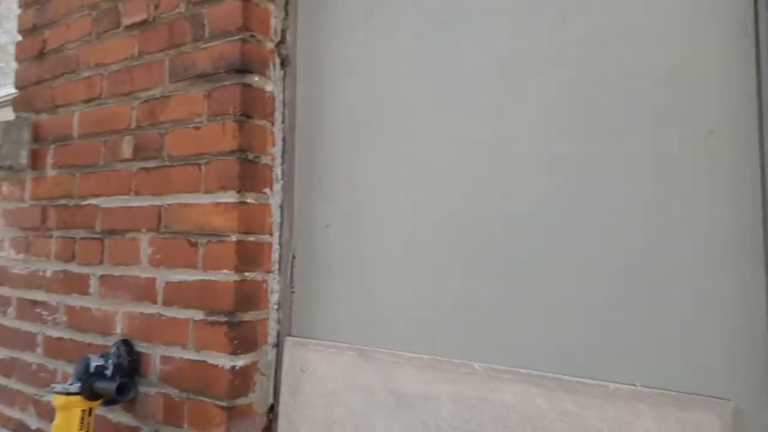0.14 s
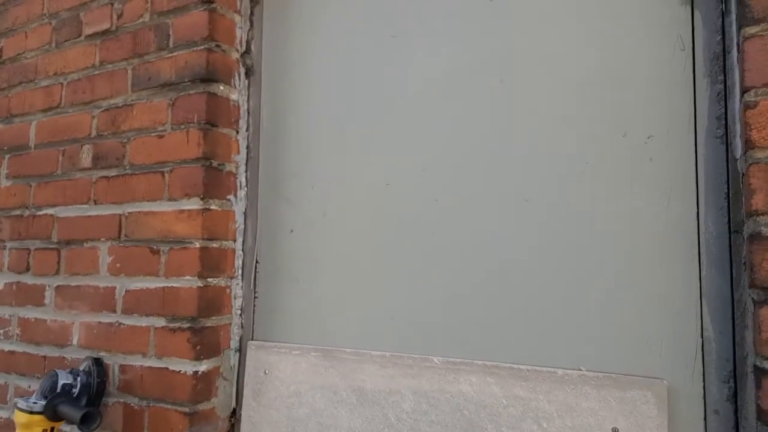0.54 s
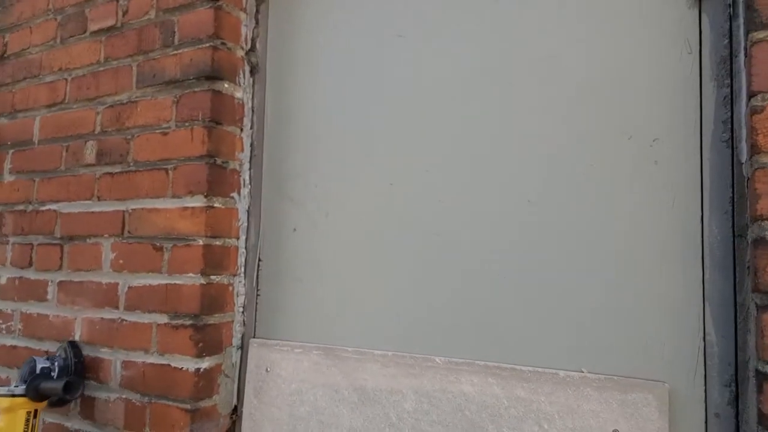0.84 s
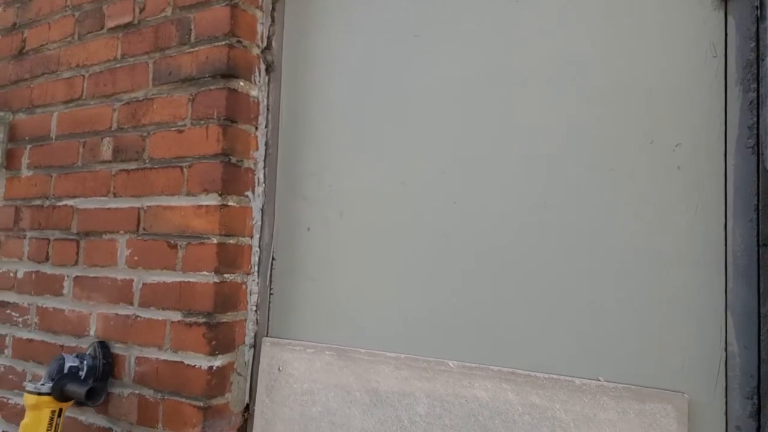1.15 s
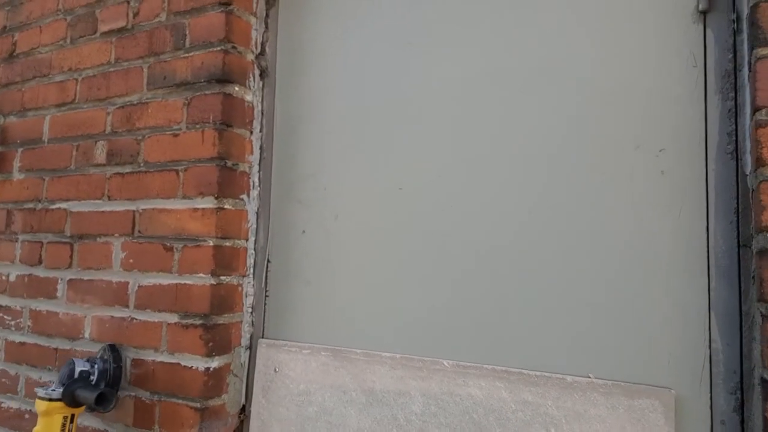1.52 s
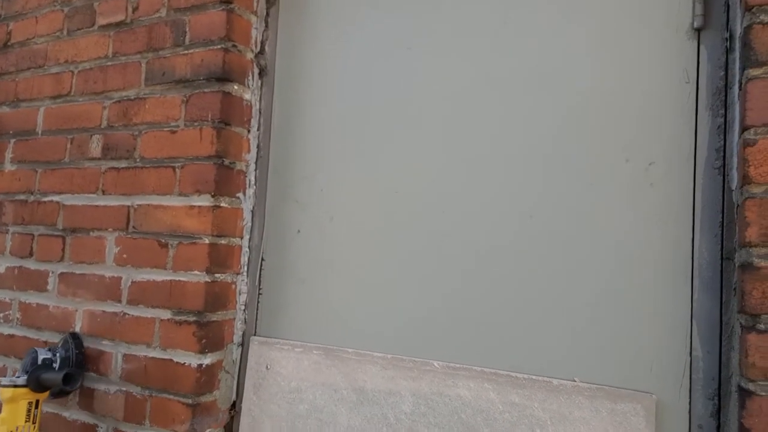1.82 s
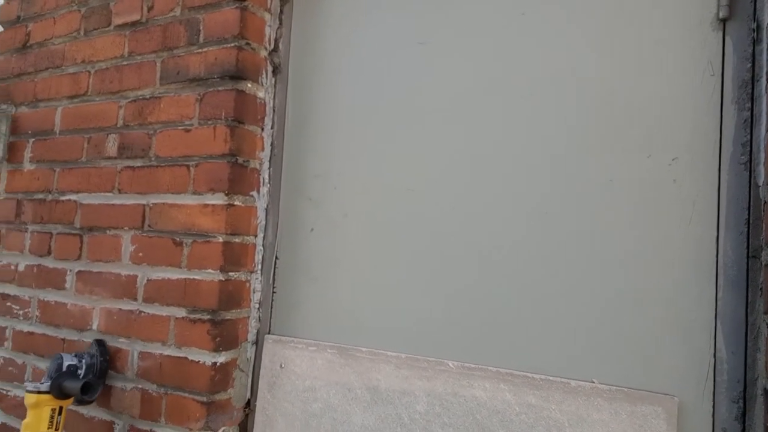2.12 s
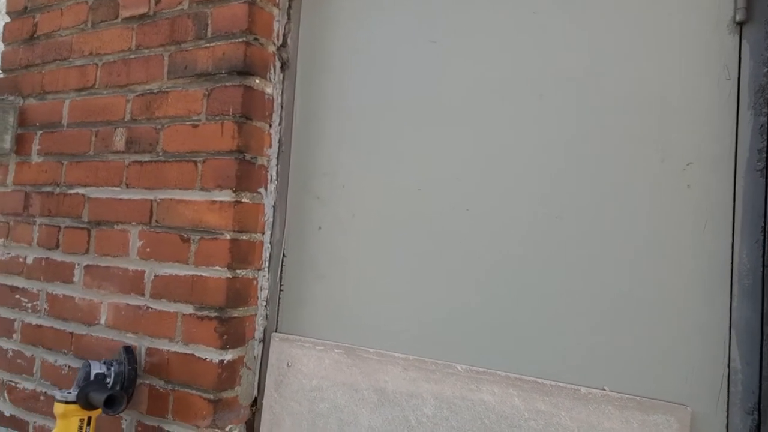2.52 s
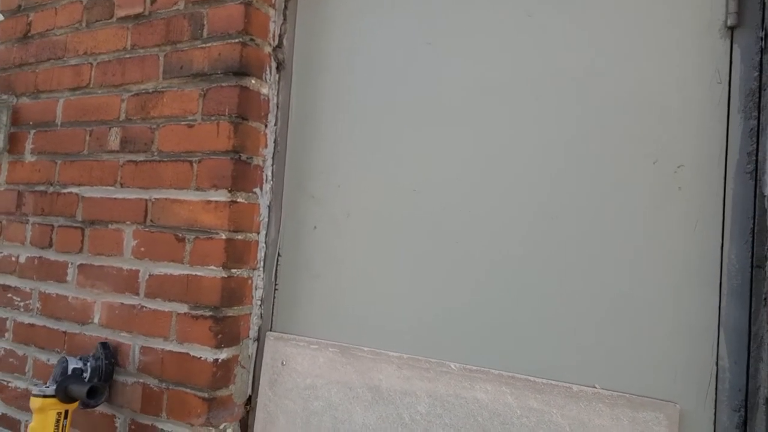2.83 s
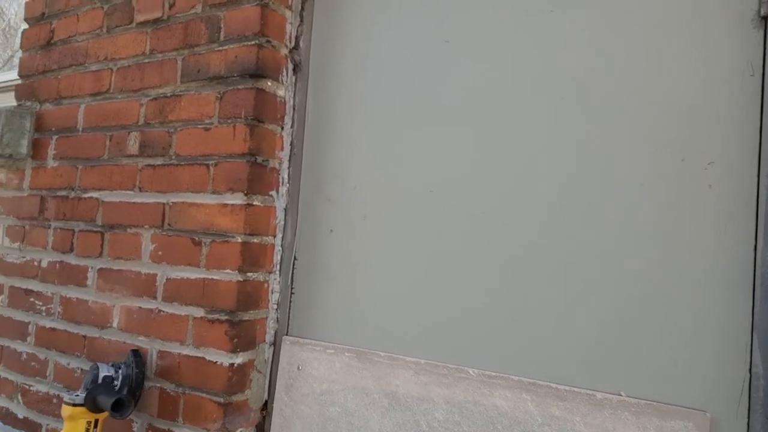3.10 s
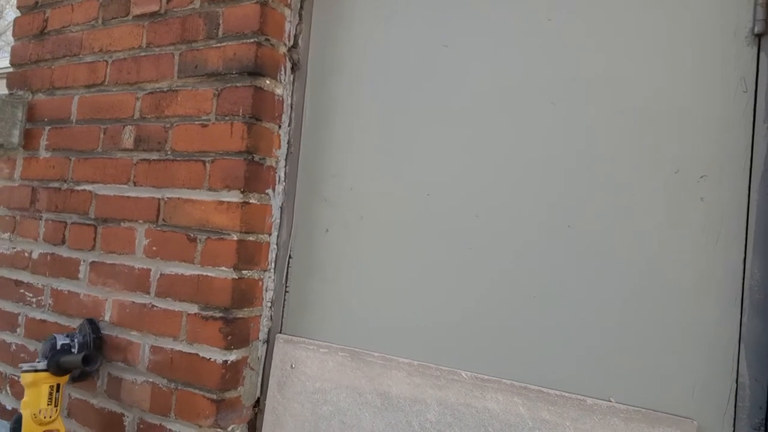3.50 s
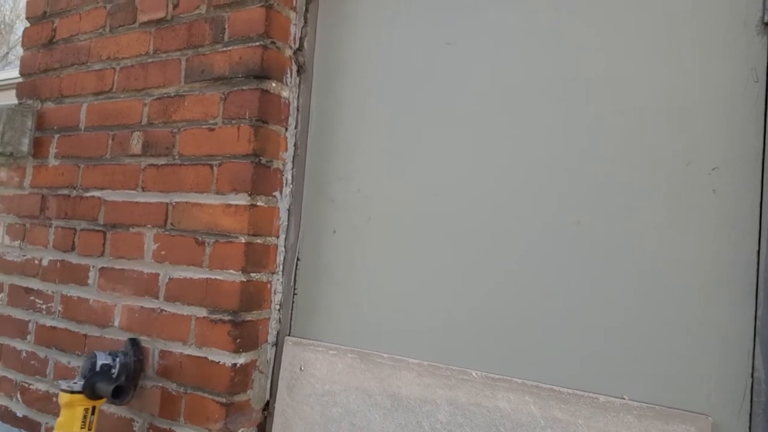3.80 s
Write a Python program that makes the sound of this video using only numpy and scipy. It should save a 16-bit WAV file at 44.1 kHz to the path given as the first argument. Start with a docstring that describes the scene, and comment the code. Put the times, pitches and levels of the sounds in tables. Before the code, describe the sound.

A handheld angle grinder grinds mortar from brick throughout, its bright hiss fluttering rapidly over a whine that sags slightly; outdoors, close to a stereo camera microphone, slightly left, with low wind thumps.

```python
"""A handheld grinder scrapes mortar off a brick wall outdoors, a little left of a two-port camera microphone.
The grit is already running at the start: its hiss throbs as the disc's high spot bites once a turn; motor
and gears whine under it while multiples of the turn ring in and out. The strongest wind buffet comes near
0.7 s, the wind rumble lulls near 1.9 s, and the disc sags under load from 108.5 to about 105 turns per second.
Buffets crowd together after 3.1 s. Filtered noise makes grit, body and wind; sines make the tones."""
import sys
import numpy as np
from scipy import signal
from scipy.fft import rfft, irfft
from scipy.io import wavfile
from scipy.ndimage import uniform_filter1d, map_coordinates

SR = 44100
rng = np.random.default_rng(int(sys.argv[2]) if len(sys.argv) > 2 else 0)


def to_wav(s):
    """Save 16-bit WAV."""
    ch = np.atleast_2d(s).T  # columns
    pcm = np.round(np.clip(ch, -1, 1) * 32767)  # PCM
    wavfile.write(sys.argv[1], SR, pcm.astype(np.int16))


N = 174195

# Hearing of the two ports: (frequency [Hz], likeness [0-1], left minus right [dB])
PORT_HEARING = [(200, .5, 1), (700, .78, 1.5), (1200, .8, 1.4), (2500, .55, .8), (3300, .62, .8),
                (4200, .5, 1.5), (5500, .76, 3), (7500, .5, 3), (9000, .42, 1.5), (11000, .52, 3),
                (14000, .3, 2)]
PORT_LAG_S = 8.5 / 44100  # the right port hears the tool this much later


def undb(db):
    """Logarithmic level: amplitude gain of a dB value."""
    return 10 ** (np.asarray(db) / 20)


def curve(table, col):
    """Linear interpolation of a table column over time."""
    rows = np.array(table, float)
    return np.interp(np.arange(N) / SR, rows[:, 0], rows[:, col])


def bin_hz():
    """Discrete spectrum: frequency of each bin."""
    return np.fft.rfftfreq(N, 1 / SR)


def over_hz(table, col=1):
    """Interpolation of a table column over log frequency."""
    rows = np.array(table, float)
    return np.interp(np.log(bin_hz() + 1), np.log(rows[:, 0]), rows[:, col])


def unit(x):
    """Power normalisation: scale to rms 1."""
    return x / np.sqrt(np.mean(x ** 2))


def walk(rate):
    """Band-limited random modulation: levels held 1 / rate s and slewed twice; spread near 1."""
    hold = int(SR / rate)
    steps = np.repeat(rng.standard_normal(N // hold + 1), hold)
    slewed = uniform_filter1d(uniform_filter1d(steps, hold), hold)
    return 1.3 * slewed[:N]


def port_path():
    """Time and level differences: phase of the right port's delay, and half the level difference as a gain."""
    late = np.exp(-2j * np.pi * bin_hz() * PORT_LAG_S)
    lean = undb(over_hz(PORT_HEARING, col=2) / 2)
    return late, lean


def ports(direct, scattered):
    """Partial coherence: both ports share the direct spectrum, while the scattered ones differ."""
    like = np.clip(over_hz(PORT_HEARING), 0, 1)
    late, lean = port_path()
    direct_pair = direct * np.array([np.ones_like(late), late])
    both = np.sqrt(like) * direct_pair + np.sqrt(1 - like) * scattered
    return both * np.array([lean, 1 / lean])


def noise():
    """Partly coherent white noise: its spectra at the two ports."""
    three = rfft(rng.standard_normal((3, N)))
    return ports(three[0], three[1:])


def wind():
    """Turbulence: incoherent low rumble at each port, with short pressure swings that carry a rustle."""
    # Rumble before a 6 dB lift: (time [s], level [dB])
    wind_level = [(0.0, -48.5), (0.2, -51), (0.43, -52.5), (0.81, -49.5), (1.07, -47.5), (1.23, -46),
                  (1.78, -50.5), (1.92, -60), (2.61, -56), (2.99, -55), (3.1, -56.5), (3.86, -46.5),
                  (3.95, -54)]
    # Rumble spectrum: (frequency [Hz], relative density [dB])
    wind_colour = [(20, -31), (50, -6), (100, 0), (170, -9), (300, -7.5), (500, -11), (900, -47)]
    # Buffets: (start [s], swing peak level [dB], pitch [Hz], left minus right [dB], rustle share [capped at 1])
    buffets = [(0.197, -33, 86.1, 5, 0.46), (0.66, -31.5, 111, 3, 1), (0.69, -18, 144, -0.5, 0.65),
               (0.829, -29.5, 118, 8, 1), (0.859, -38, 141, 7, 1), (1.055, -34, 108, 18.5, 0.72),
               (1.26, -30, 72.6, -5, 0.34), (1.343, -31, 80.7, 1, 0.57), (1.388, -31, 88.8, 7, 0.81),
               (1.598, -27.5, 153, 7, 0.57), (1.649, -28, 72.6, 2, 0.33), (1.9, -32, 96.9, 0.5, 0.49),
               (2.541, -27, 110, 2, 0.65), (2.591, -32, 107.7, -1, 0.58), (2.9, -34, 68.2, -1, 0.71),
               (2.949, -32.5, 96.9, 6, 0.77), (3.019, -34, 104.5, -0.5, 0.51), (3.14, -30.5, 81, -10, 0.3),
               (3.215, -24.5, 107.3, 1, 0.66), (3.347, -32, 86.5, 1, 0.5), (3.465, -25.5, 94.5, 2, 0.38),
               (3.57, -24, 113.3, 1, 0.63), (3.609, -30, 120.7, 1, 0.54), (3.693, -23, 102.9, -1, 0.67),
               (3.725, -29, 240, 0, 1), (3.761, -26.5, 110, -4, 1), (3.829, -36, 65.2, 15, 0.38),
               (3.91, -33, 88, -3, 0.45)]
    # Rustle band: (low edge [Hz], high edge [Hz])
    rustle_hz = (170, 465)
    gust_db = 4.5
    peak_s, width_s, cycles = .0158, .0061, .7  # peak after the start, rustle width scale, swing width

    rumble = unit(irfft(rfft(rng.standard_normal((2, N))) * undb(over_hz(wind_colour)), N))
    gusts = np.array([walk(30.14), walk(29.6)])
    out = rumble * undb(curve(wind_level, col=1) + 6.0 + gust_db * gusts)

    band = signal.butter(2, rustle_hz, "band", fs=SR, output="sos")
    rustle = unit(signal.sosfilt(band, rng.standard_normal((2, N))))
    t = np.arange(int(.08 * SR)) / SR - peak_s
    chance = rng.standard_normal((len(buffets), 2))
    for (start, db, hz, pan_db, share), (a, b) in zip(buffets, chance):
        i = int(start * SR)
        n = min(len(t), N - i)
        swell = np.exp(-(t * hz / cycles) ** 2)
        tail = min(share, 1) * np.exp(-(t / (3 * width_s)) ** 2)
        for ch, side in enumerate((1, -1)):
            phase = .4 * a + side * (.8 + .2 * b)
            swing = np.cos(2 * np.pi * hz * t + phase) * swell
            buffet = swing[:n] + 0.5 * tail[:n] * rustle[ch, i:i + n]
            out[ch, i:i + n] += undb(db + side * pan_db / 2) * buffet
    return out


def body():
    """Broadband flow and casing noise: cooling air and tool body give steady coloured noise."""
    # Spectrum: (frequency [Hz], relative density [dB])
    body_colour = [(200, -11), (500, -1.5), (900, 7.5), (1200, 4.5), (1700, 5.5), (2200, -1.5), (3500, -6),
                   (8000, -4.5)]
    level_db = -32.5 + 0.72 * walk(5.3)
    return unit(irfft(noise() * undb(over_hz(body_colour)), N)) * undb(level_db)


def sine(cycles):
    """Phase modulation: a sine of rms 1 at a random start phase, with quick phase jitter."""
    shake = .06 * walk(60)  # cycles
    return np.sqrt(2) * np.sin(2 * np.pi * (cycles + rng.random() + shake))


def tones(turn):
    """Rotational harmonics: gear whine, motor hum and multiples of the disc turn as sines."""
    # Gear whine before a 4 dB lift: (time [s], pitch [Hz], level [dB])
    whine = [(0.0, 1062, -42), (0.08, 1040, -52), (0.27, 1060, -40.5), (0.66, 1042, -44), (0.77, 1054, -37),
             (0.79, 1050, -48), (0.82, 1039, -37), (1.12, 1057, -43), (1.25, 1040, -39), (1.34, 1041, -43),
             (1.85, 1036, -39), (1.87, 1030, -45), (2.05, 1031, -46), (2.1, 1049, -40), (2.46, 1024, -41),
             (2.49, 1028, -46.5), (2.78, 1027, -38.5), (3.02, 1041, -44.5), (3.22, 1024, -39.5),
             (3.94, 1027, -43.5)]
    # Ringing multiples: (time [s], 14th [dB], 15th [dB], 16th [dB], 17th [dB], base of the high ones [dB])
    ring = [(.1, -48, -46, -42, -53, -52), (.4, -46, -48, -43, -54, -52), (.9, -52, -49, -45, -53, -54),
            (1.3, -50, -41, -48, -51, -48), (1.65, -48, -39, -47, -42, -44),
            (2.05, -48, -50, -47, -46, -44), (2.45, -43, -47, -39, -49, -46),
            (2.85, -53, -49, -41, -48, -48), (3.15, -44, -47, -38, -43, -43),
            (3.38, -47, -49, -40, -43, -39), (3.55, -51, -51, -48, -43, -50),
            (3.95, -49, -49, -42, -42, -43)]
    # High multiples: (multiple of the turn rate, level over the base [dB])
    high_ring = [(28.5, -4), (31, -3), (32, 3), (33, 0), (35.5, -4)]
    # Fainter tones that come and go: (multiple of the turn rate, mean level [dB])
    faint = [(6.15, -57), (8, -59), (12, -59), (19.5, -56)]
    waver_hz, faint_wander_db = 2.7, 3
    motor_ratio, motor_db = 3.555, -52  # motor cycles per disc turn, level

    whine_cycles = np.cumsum(curve(whine, col=1) + waver_hz * walk(40)) / SR
    out = undb(curve(whine, col=2) + 4.0) * sine(whine_cycles)
    out = out + undb(motor_db + 1.5 * walk(15)) * sine(motor_ratio * turn)
    for k in range(4):
        out = out + undb(curve(ring, col=k + 1) + 1.8 * walk(30)) * sine((14 + k) * turn)
    for multiple, db in high_ring:
        out = out + undb(curve(ring, col=5) + db + 2.5 * walk(8)) * sine(multiple * turn)
    for multiple, db in faint:
        out = out + undb(db + faint_wander_db * walk(9.6)) * sine(multiple * turn)
    late, lean = port_path()
    return irfft(rfft(out) * np.array([lean, late / lean]), N)


def repeating(turn):
    """Cyclic correlation: noises laid round the disc rim, where each turn replays much of the last one."""
    rim = 1024  # points round the rim
    kept = .6  # share of the surface pattern left after one turn
    fresh = rng.standard_normal((3, int(turn[-1]) + 2, rim))
    rows = signal.lfilter([1], [1, -kept], fresh, axis=1)
    smooth = irfft(rfft(rows) * (np.arange(rim // 2 + 1) < 200), rim)  # under 200 cycles a turn
    read = [map_coordinates(r.ravel(), [turn * rim], order=1) for r in smooth]
    spec = rfft(np.array(read))
    # Match the power of white noise below a third of the sample rate
    spec = spec * np.sqrt(N / np.mean(np.abs(spec[:, :N // 3]) ** 2))
    return ports(spec[0], spec[1:])


def bite_pulse(turn):
    """Periodic contact: the high spot bites with a quick rise and exponential fall, once a turn."""
    rise, fall = .1, .4  # shares of a turn
    p = turn % 1
    shape = (1 - np.exp(-p / rise)) * np.exp(-p / fall)
    return shape / shape.mean()


def grit(turn):
    """Amplitude modulation: patchy bands of hiss, partly repeating every turn, swell as the disc bites."""
    # Centres of the low-mid, mid, treble and top ranges [Hz]
    ranges_hz = [3400, 6000, 10000, 13500]
    # Levels before a 3.5 dB lift: (time [s], low-mid [dB], mid [dB], treble [dB], top [dB])
    grit_level = [(0.0, -52, -19, -25, -19), (0.02, -38, -33, -38, -27), (0.04, -37, -24, -24, -21),
                  (0.07, -35, -22, -30.5, -21), (0.14, -40, -22, -23, -17), (0.19, -35, -22, -25, -21),
                  (0.31, -37.5, -27.5, -29, -24), (0.43, -38, -27.5, -26.5, -20),
                  (0.68, -37.5, -24.5, -25.5, -22), (0.78, -34.5, -26, -28, -25),
                  (0.89, -36.5, -29, -29, -22.5), (0.98, -40, -30.5, -31, -28),
                  (1.11, -37, -25.5, -30, -26), (1.15, -39, -26, -27, -25.5),
                  (1.25, -35.5, -25.5, -28, -23.5), (1.43, -37, -28.5, -29, -21.5),
                  (1.66, -33.5, -24.5, -25.5, -24), (2.0, -37.5, -28, -31.5, -26),
                  (2.32, -35, -27, -27, -23.5), (2.53, -36.5, -26.5, -27, -24.5),
                  (2.73, -33, -27.5, -27.5, -22.5), (3.01, -40, -30, -32, -25.5),
                  (3.08, -34.5, -25.5, -28.5, -26.5), (3.23, -33, -27, -28, -21.5),
                  (3.43, -34, -25, -27, -23.5), (3.65, -37.5, -24.5, -29, -25.5),
                  (3.85, -32, -26.5, -29.5, -22.5), (3.93, -35.5, -27, -29, -24),
                  (3.95, -33, -35, -39.5, -31)]
    # Colour inside each range: (frequency [Hz], relative density [dB])
    grit_colour = [(2300, -16), (3000, -8), (3500, -7), (4100, -8), (5200, -5), (6800, -2), (7600, 1),
                   (8100, -4.5), (9200, -3), (11500, 4), (13500, 5.5), (15700, -0.5)]
    # Power share of the hiss that repeats: (frequency [Hz], share [0-1])
    repeat_share = [(3000, .45), (5000, .5), (7500, .58), (10000, .36), (15000, .25)]
    # Slope of the mid range about its centre: (time [s], slope [dB per half octave])
    tilt = [(0, 11.5), (.22, 0), (.4, -1.5), (.8, -2.5), (1.2, 0), (1.5, 0.5), (2.1, -4), (2.3, 2),
            (3.2, -0.5), (3.45, -1), (3.9, 6)]
    # Depth of the bite before each range takes its share: (time [s], depth [0-1])
    bite_depth = [(0, .78), (.35, .82), (.55, .68), (1.3, .65), (1.6, .4), (1.9, .7), (2.05, .52),
                  (2.4, .6), (3.05, .43), (3.4, .5), (3.55, .8), (3.8, .45), (3.95, .45)]
    # Share of that depth in each range [0-1]
    range_bite = [.45, .7, .68, .76]
    patch_db, flicker_db, flutter_db, grain_db = .9, 1.6, 1.1, .72
    bite_scatter_db = 1.6  # between turns

    pulse = bite_pulse(turn)
    share = over_hz(repeat_share)
    hiss = np.sqrt(1 - share) * noise() + np.sqrt(share) * repeating(turn)
    spec = hiss * undb(over_hz(grit_colour))
    centres = 2000 * 2 ** (np.arange(31) / 10)  # Hz, ten bands an octave
    which = np.abs(np.log(centres[:, None] / ranges_hz)).argmin(axis=1)
    turns = rng.standard_normal((len(ranges_hz) + 1, int(turn[-1]) + 1))  # last row: shared by all ranges
    out = 0
    for r in range(len(ranges_hz)):
        part = 0
        for c in centres[which == r]:
            offset = 10 * np.log2((bin_hz() + 1) / c)  # in band spacings
            window = np.cos(np.pi / 2 * np.clip(offset, -1, 1)) ** 2
            band_db = patch_db * walk(12) + flicker_db * walk(35.14)
            if r == 1:
                band_db = band_db + curve(tilt, col=1) * np.log2(c / ranges_hz[r]) * 2
            part = part + irfft(spec * window, N) * undb(band_db)
        turn_db = bite_scatter_db * (turns[r] + turns[-1]) / np.sqrt(2)
        scatter = undb(turn_db)[turn.astype(int)]
        depth = np.clip(range_bite[r] * curve(bite_depth, col=1), 0, 1)
        bite = 1 - depth + depth * scatter * pulse
        bite = bite / np.sqrt(uniform_filter1d(bite ** 2, SR // 20))  # even power over 50 ms
        bite = bite * undb(grain_db * walk(900))
        out = out + unit(part) * undb(curve(grit_level, col=r + 1) + 3.5) * bite
    return out * undb(flutter_db * walk(18))


def scene():
    """Superposition: wind and tool add at the two ports, the tool timed by the disc's rotation angle."""
    # The disc sags under load: (time [s], rate [turns per s])
    disc = [(0, 108.5), (1.1, 107.7), (1.7, 106.3), (2.1, 106.8), (2.7, 105.9), (3.17, 106), (3.41, 104.6),
            (3.95, 105)]
    turn = .17 + np.cumsum(curve(disc, col=1)) / SR  # turns, from the start angle
    return wind() + body() + tones(turn) + grit(turn)


def record(dry):
    """Saturation and low-pass filtering: the camera rounds the loudest peaks and cuts the top steeply."""
    soft_clip, top_hz = 1.45, 15750
    rounded = np.tanh(soft_clip * dry) / soft_clip
    low_pass = signal.ellip(14, .2, 80, top_hz, fs=SR, output="sos")
    return signal.sosfilt(low_pass, rounded)


dry = scene()
out = record(dry)
to_wav(out)
```